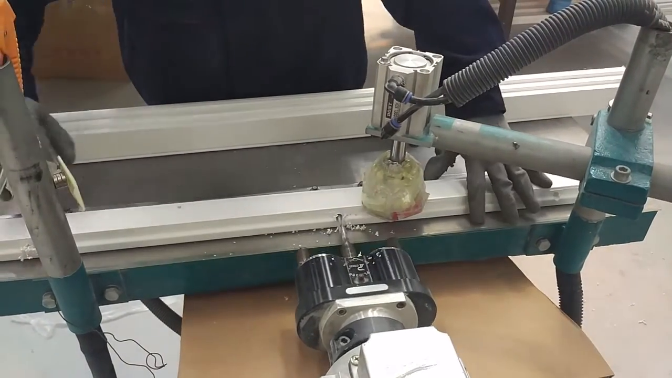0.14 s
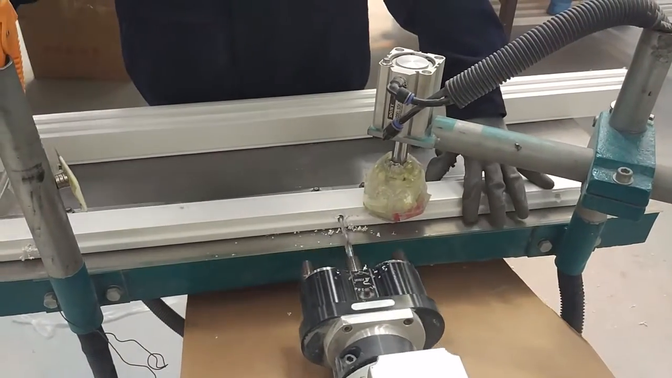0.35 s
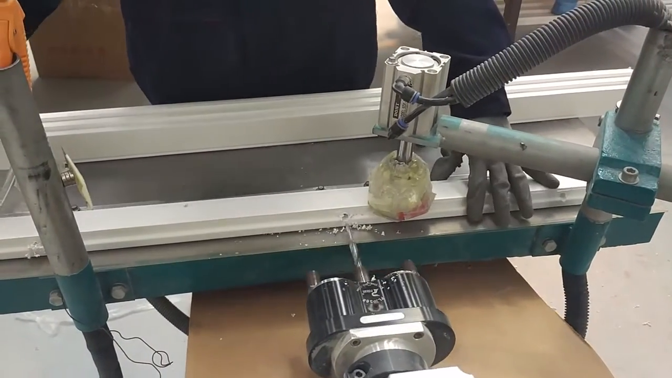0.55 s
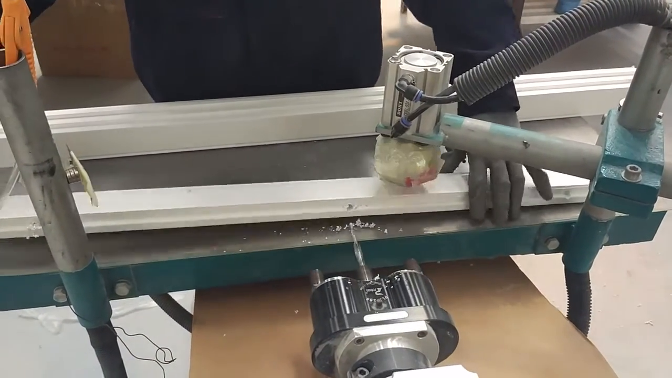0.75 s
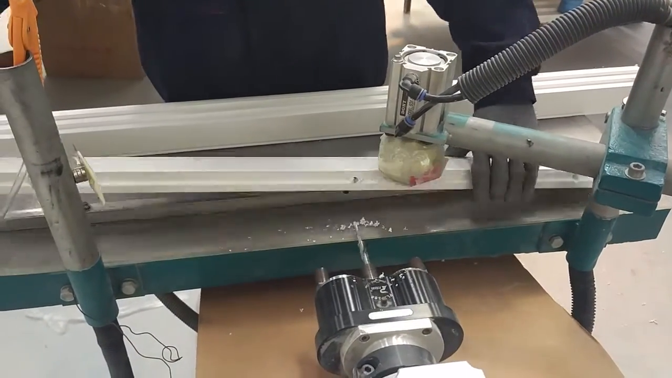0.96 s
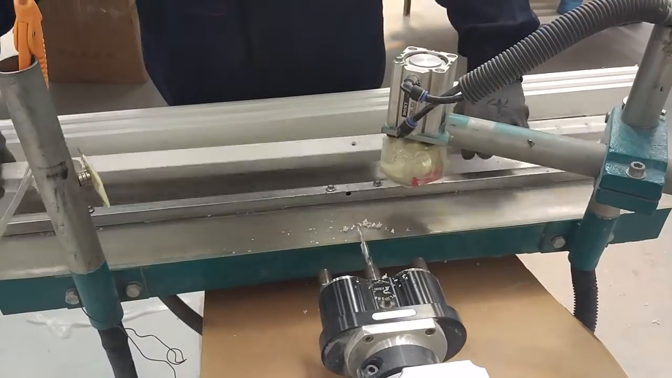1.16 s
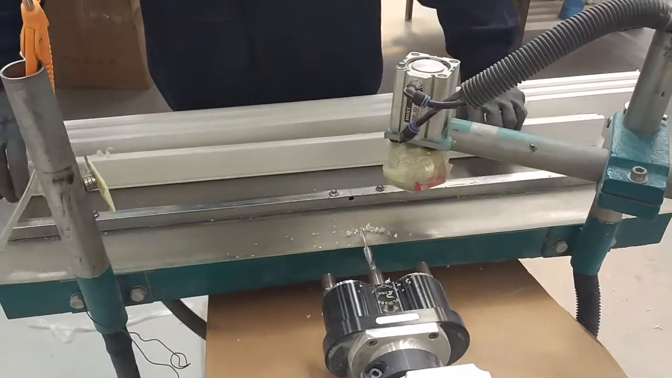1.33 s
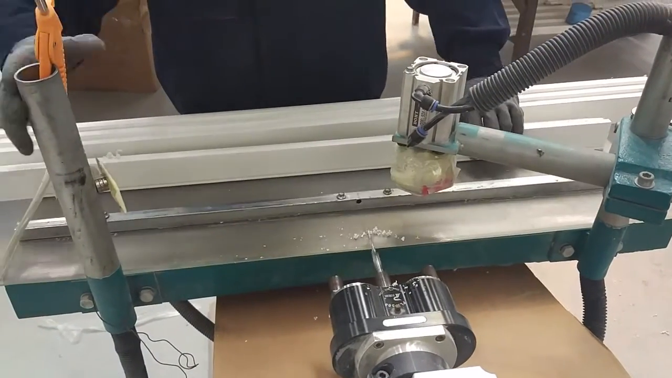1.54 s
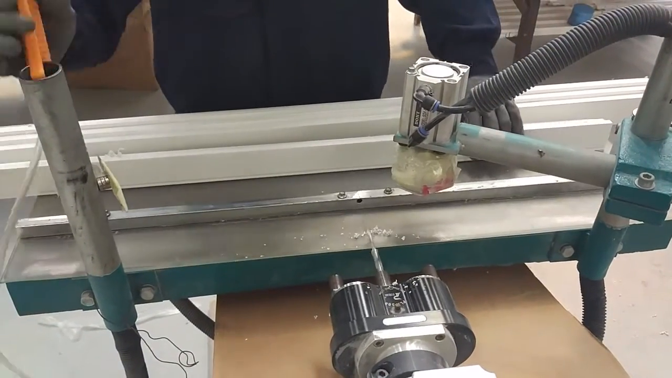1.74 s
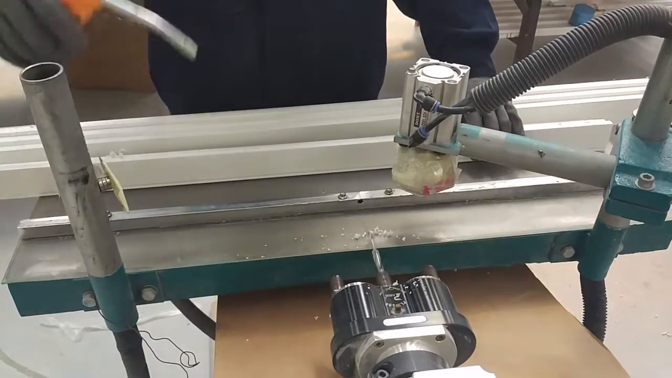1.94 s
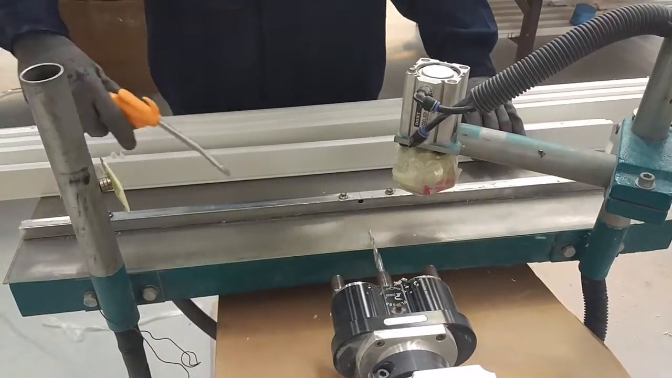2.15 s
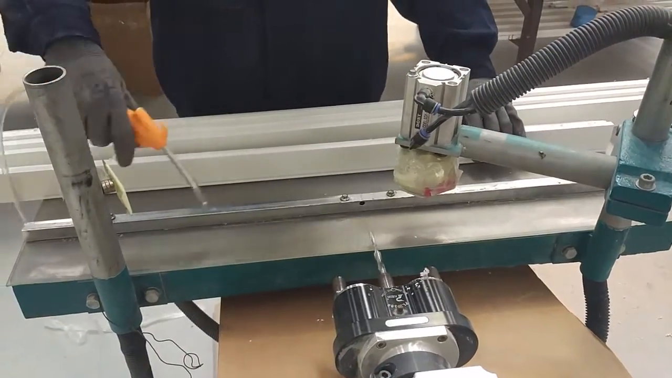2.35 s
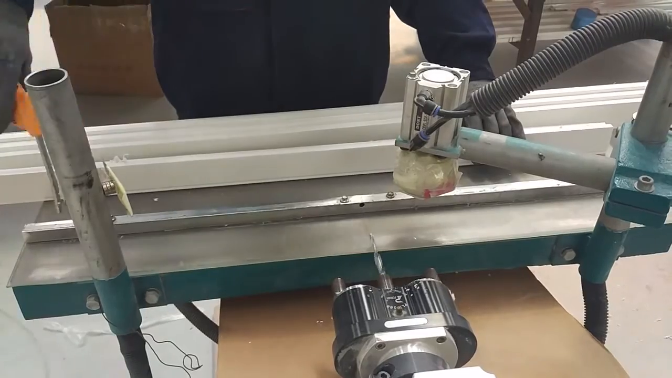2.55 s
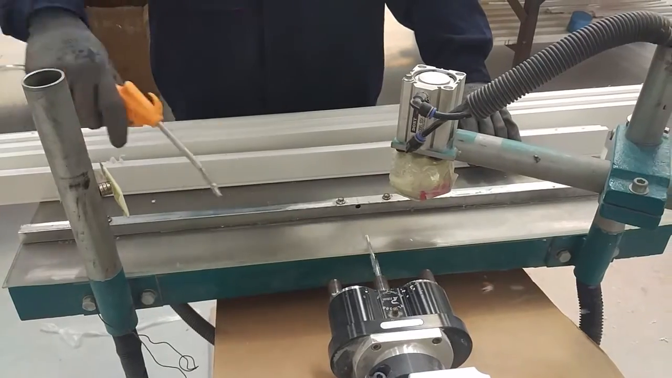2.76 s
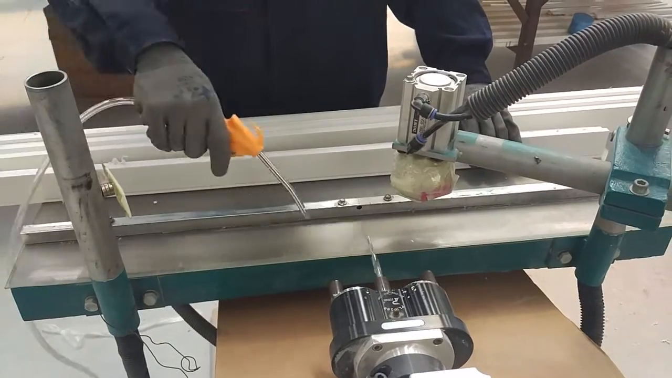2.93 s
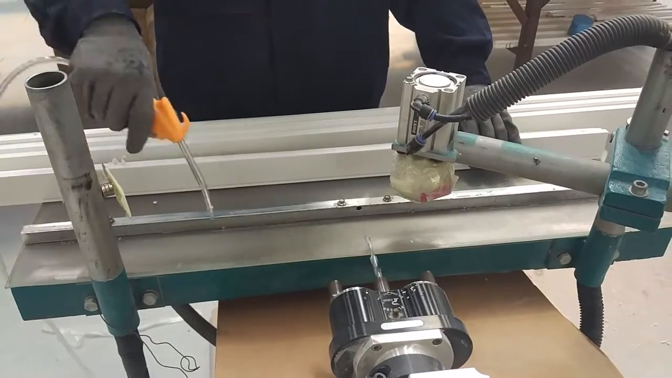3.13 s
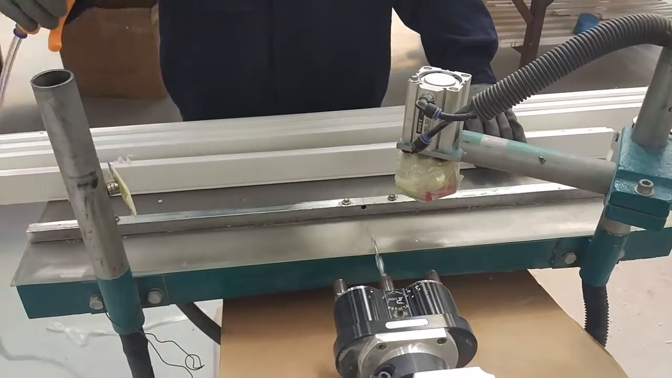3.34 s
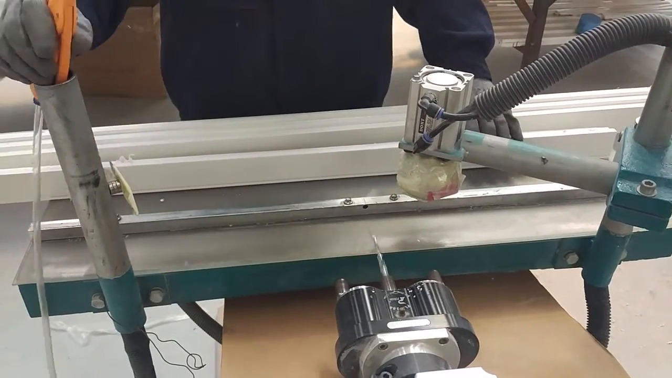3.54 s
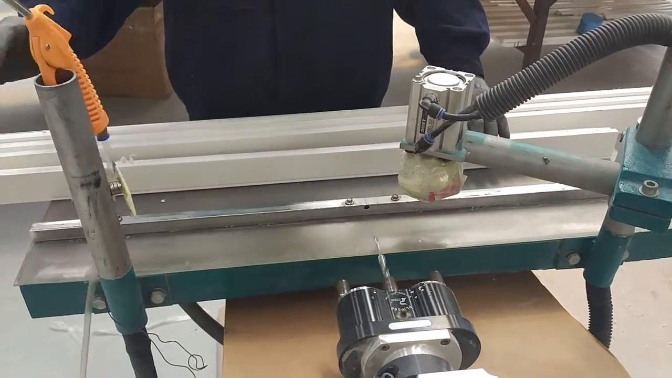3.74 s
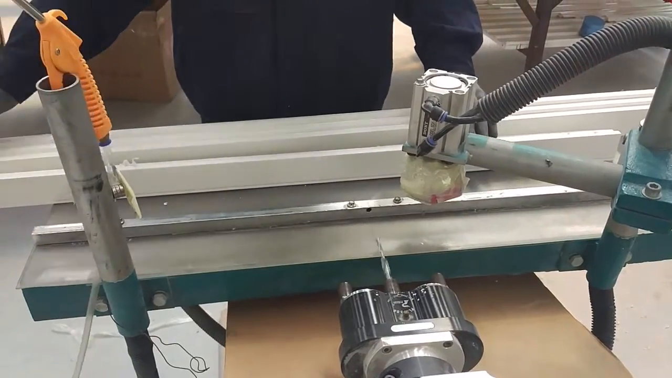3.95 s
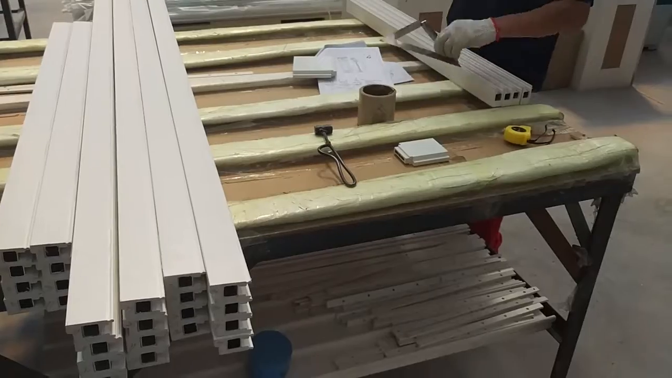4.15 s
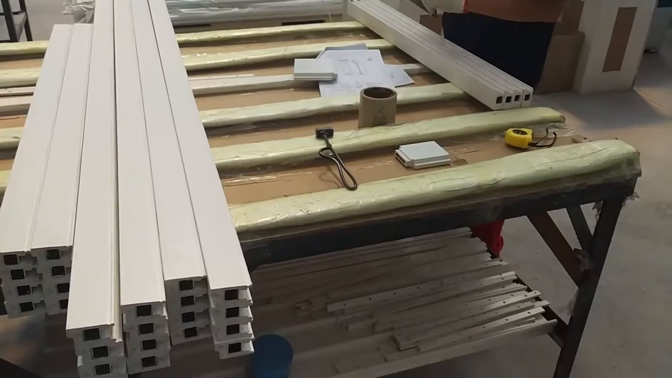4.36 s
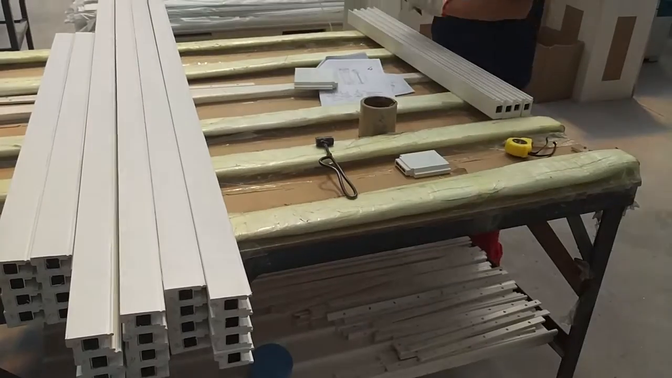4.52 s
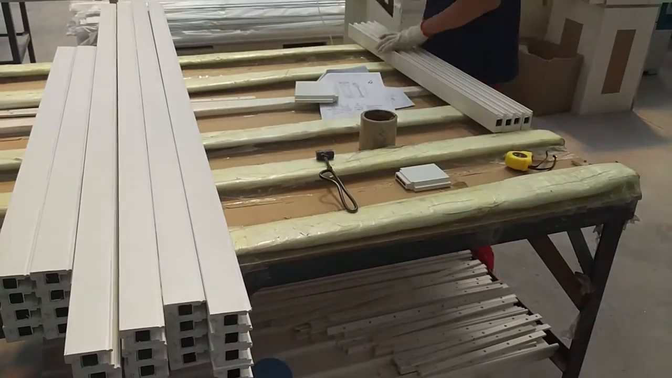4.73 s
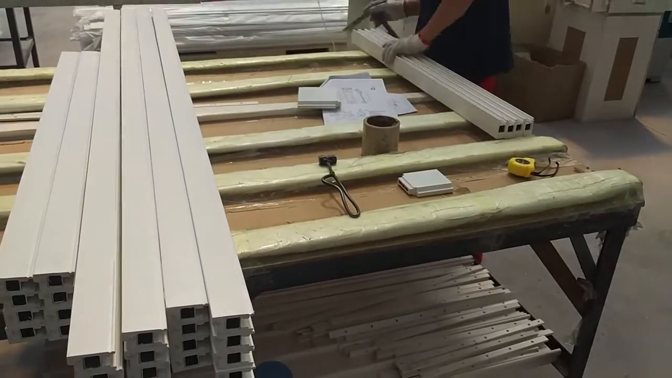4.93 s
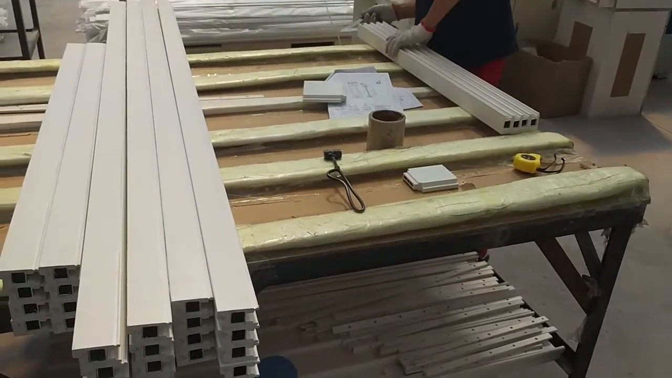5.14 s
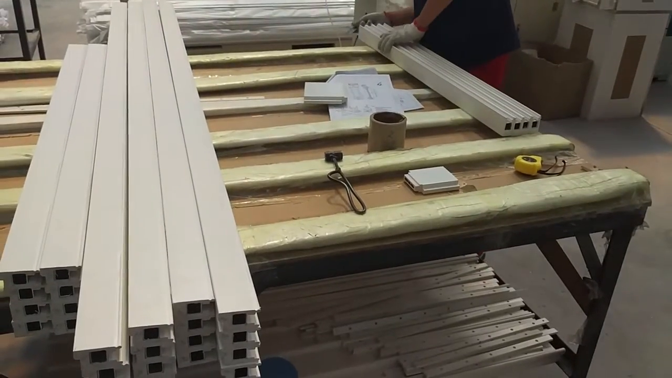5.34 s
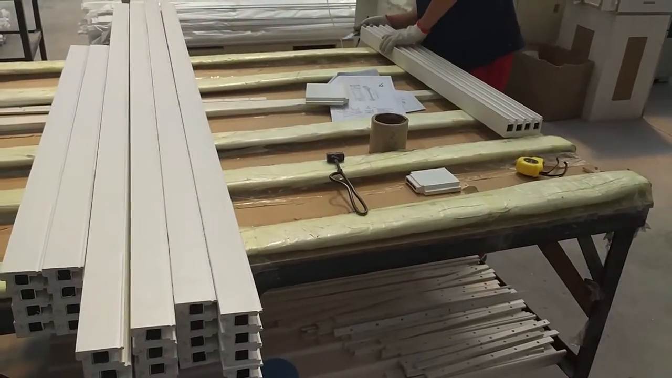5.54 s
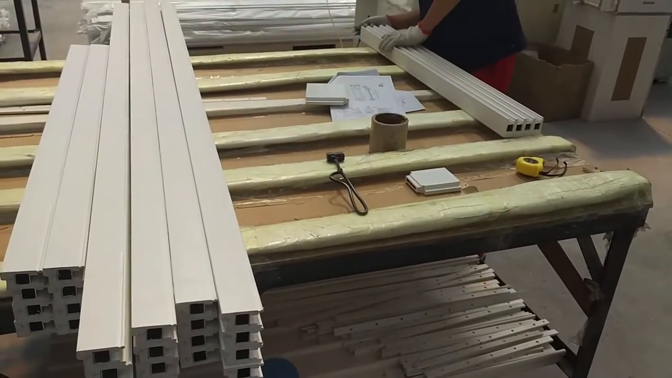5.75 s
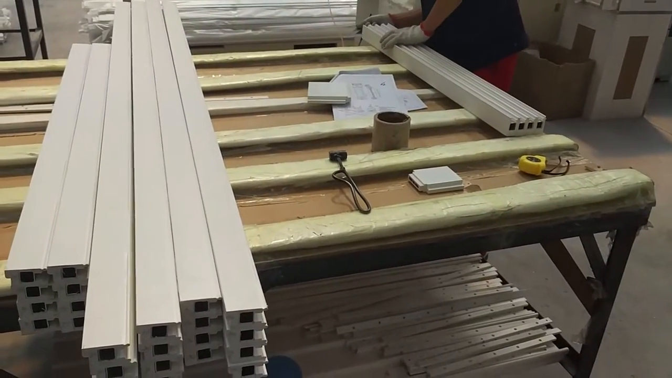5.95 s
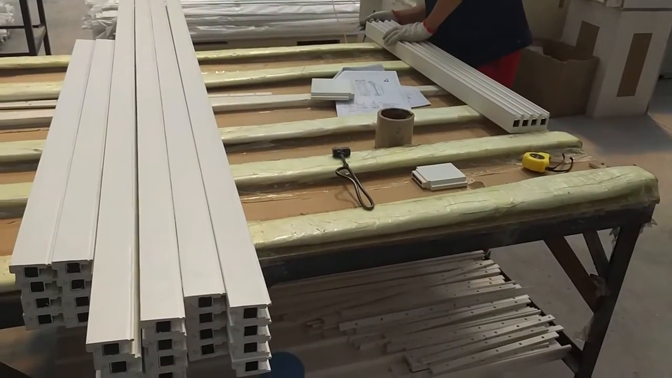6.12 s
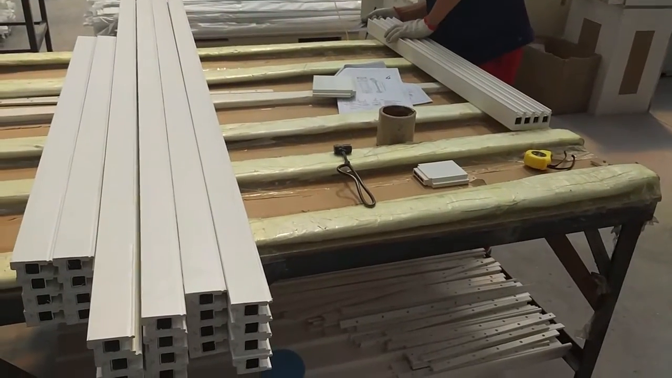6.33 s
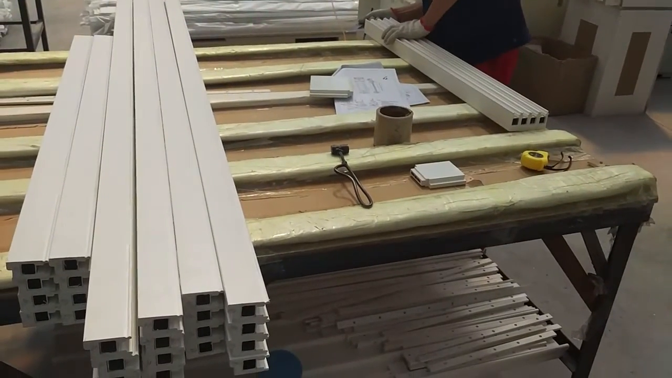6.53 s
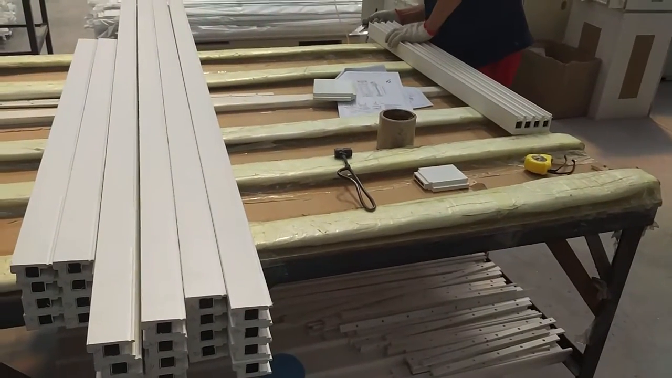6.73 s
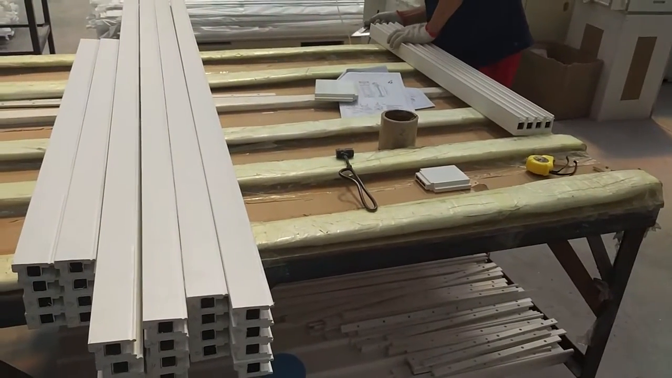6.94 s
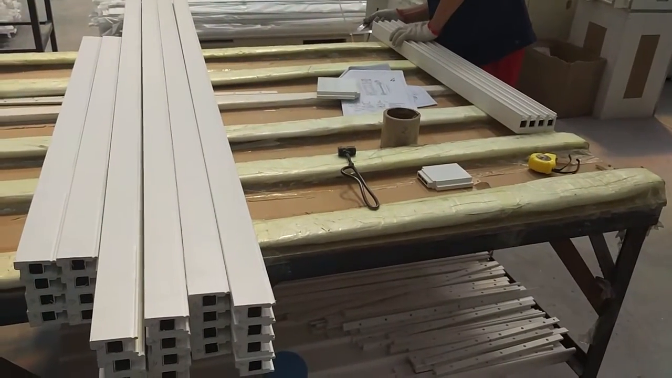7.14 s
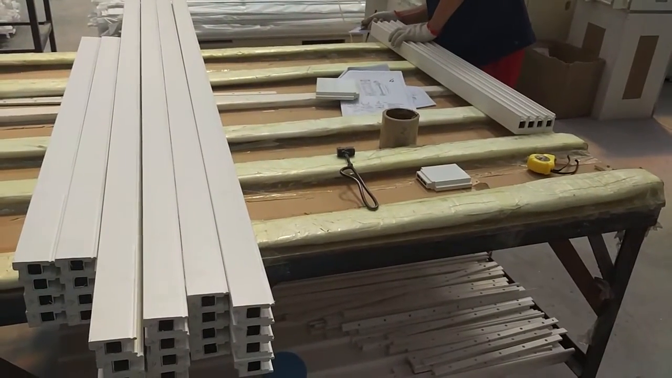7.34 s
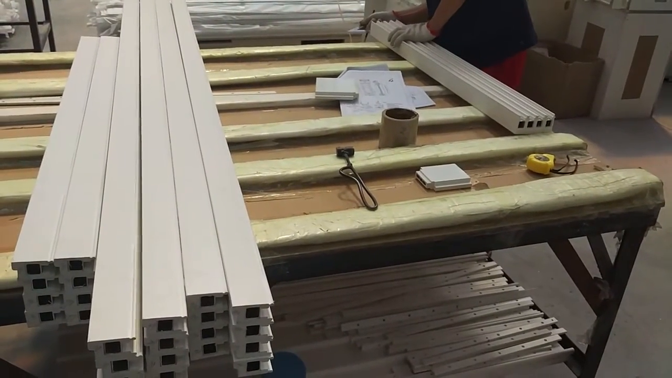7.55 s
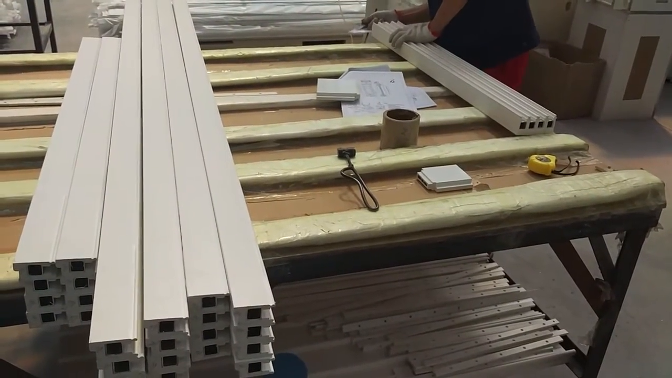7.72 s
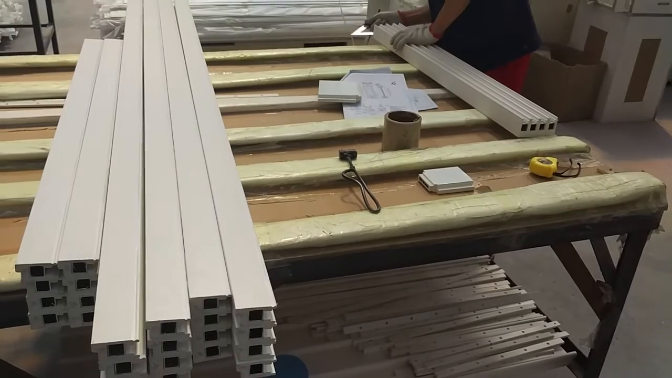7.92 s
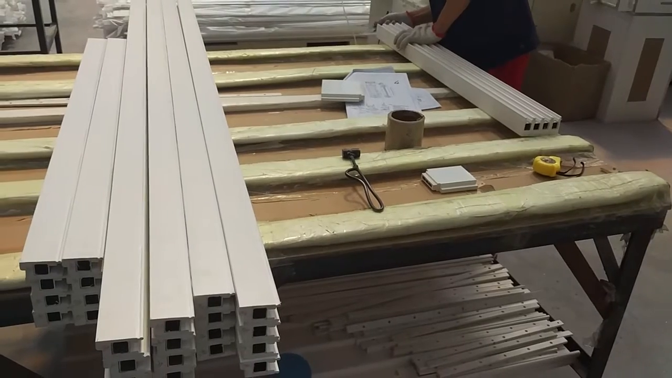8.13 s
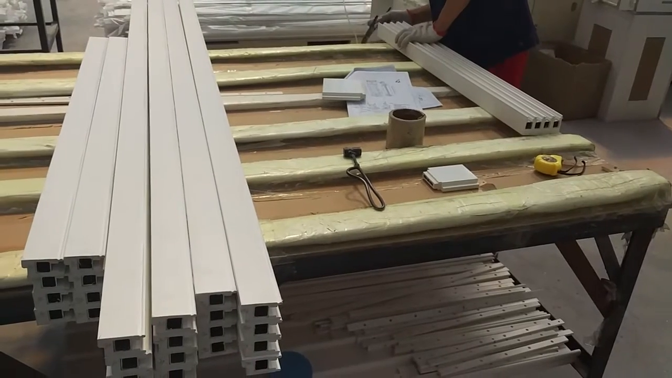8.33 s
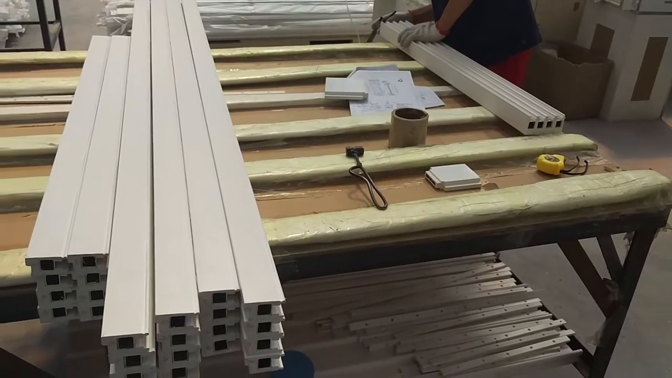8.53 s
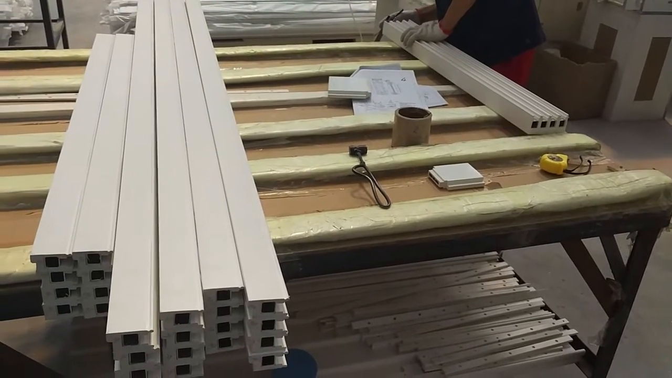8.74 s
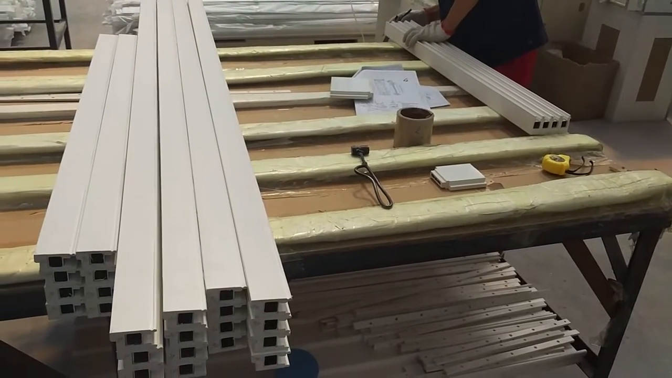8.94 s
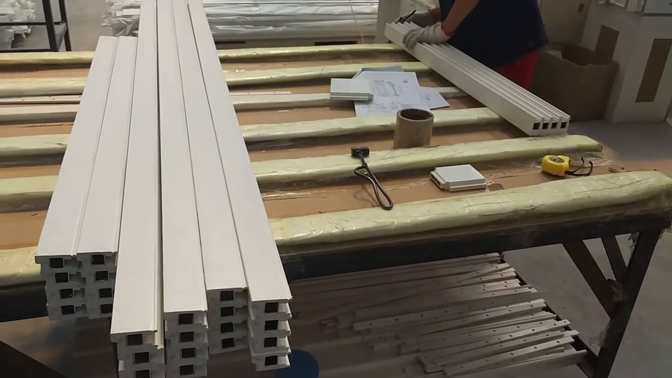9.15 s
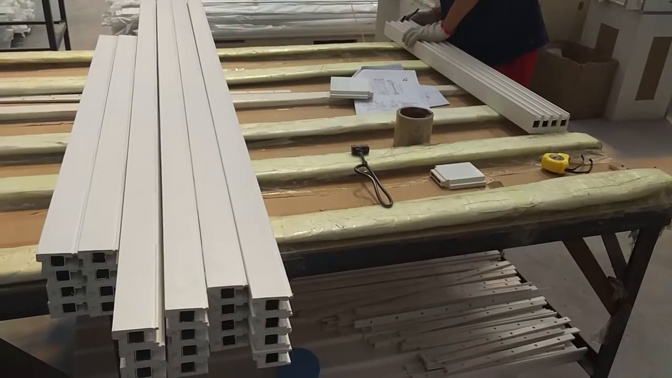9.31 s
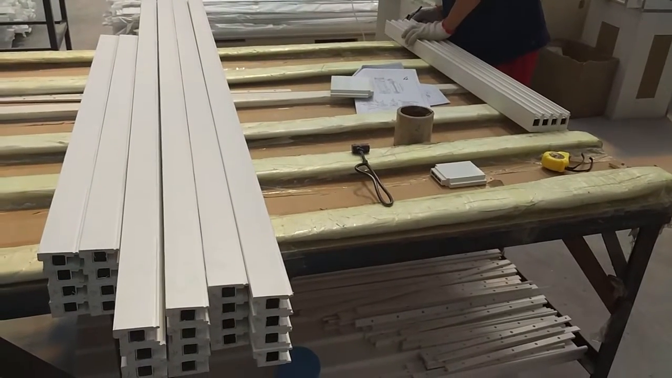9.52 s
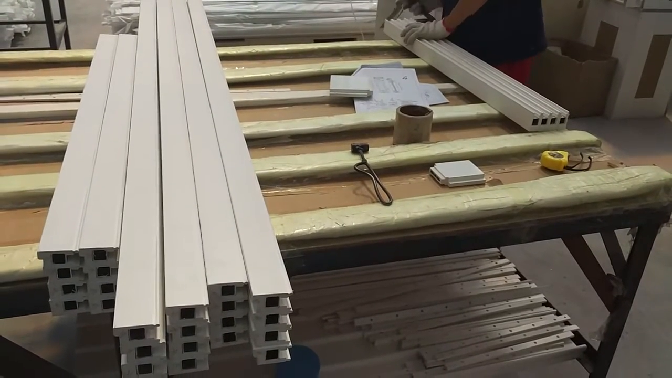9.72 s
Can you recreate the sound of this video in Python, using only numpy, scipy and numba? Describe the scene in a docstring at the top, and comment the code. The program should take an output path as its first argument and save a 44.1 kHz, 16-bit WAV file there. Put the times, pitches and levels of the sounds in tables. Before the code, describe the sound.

Steady factory machine hum with clacking plastic profile, a short pneumatic hiss and knock, a loud spitting air jet, then gusty blow-gun hissing at a bench.

```python
"""Extractor fans hum, beat and rush while a drill spindle whines; a plastic profile slides and clicks on the table.
An air clamp vents and knocks home, the profile is laid down, and a close blow gun sweeps off rattling chips.
From 4 s on, at a bench further off, a blow gun hisses and gusts around hollow profile ends over other motors.
Air is coloured noise, struck parts are decaying modes, machines are wavering sines; gain control ducks it all."""
import sys
import numpy as np
from scipy import signal
from scipy.fft import rfft, irfft
from scipy.io import wavfile
from scipy.ndimage import uniform_filter1d
from numba import njit

SR = 44100
rng = np.random.default_rng(int(sys.argv[2]) if len(sys.argv) > 2 else 0)


def store_pcm(level_fs):
    """Save levels as 16-bit WAV."""
    pcm = np.round(np.clip(level_fs, -1, 1) * 32767).astype(np.int16)
    wavfile.write(sys.argv[1], SR, np.atleast_2d(pcm).T)


N = 435708
T = np.arange(N) / SR
HZ = np.maximum(np.arange(N // 2 + 1) * SR / N, 1)
BENCH_S = 4.028  # drilling station before, bench after

# Blast levels and spectra are relative: blast() adds trims, noise() normalises.
# near blasts: [t/s, length/s, jet/dB, edge/dB, hollow/dB, jet sag/(dB/s)]
NEAR_BLASTS = [(2.121, 1.185, -13, -28, -41.5, 0.55)]
# jet crossing a rim or hole: [t/s, half length/s, edge/dB, hollow/dB]
NEAR_CROSSINGS = [(2.139, 0.019, -22, -40), (2.375, 0.056, -24, -27.5), (2.64, 0.099, -18.5, -31),
                  (2.998, 0.037, -24, -21.5), (3.132, 0.045, -17.5, -21), (3.297, 0.017, -23, -40)]
# whoosh at an opening: [t/s, half length/s, level/dB, f/Hz, width/Hz]
NEAR_GUSTS = [(2.335, 0.018, -20.5, 1410, 1200), (2.39, 0.017, -19.5, 1650, 1500),
              (2.37, .033, -25, 5030, 2200), (2.64, 0.05, -35, 1500, 1000), (2.64, 0.066, -18, 8040, 4000),
              (2.84, .06, -30.5, 4900, 1800), (2.97, .02, -30, 1400, 1200), (3.01, .03, -19, 4950, 1200),
              (3.11, .06, -23.5, 9000, 4000), (3.14, 0.023, -18, 2710, 700),
              (3.15, 0.034, -15.5, 4930, 1380)]
# free jet spectrum: [f/Hz, level/dB per Hz]
NEAR_JET = [(300, -47.5), (1200, -15), (3500, -14), (6000, -2.5), (9000, 0), (11500, 3), (13500, 6.5),
            (16000, 6.5)]
# table edge and hollow resonances: [f/Hz, width/Hz, level/dB]
TABLE_EDGE = [(4750, 900, -2.5), (5750, 1400, -1.5), (7300, 1700, -2)]
TABLE_HOLLOW = [(1370, 790, -9), (2430, 380, 0), (2850, 280, 0.5), (3750, 610, -9)]


def near_gun():
    """Close jet sweeping the table: sputtering air plus a strong band above 17.5 kHz."""
    start_s, length_s = NEAR_BLASTS[0][:2]
    levels = blast_levels(NEAR_BLASTS, NEAR_CROSSINGS, attack_s=.003, release_s=.02)
    air = blast(levels, NEAR_JET, TABLE_EDGE, TABLE_HOLLOW, jet_db=0.7, edge_db=-1.5, hollow_db=1.0,
                left_db=11.5, lag_ms=0.698, flutter_db=1.5, wander_db=2.2, drift=.035, surge_db=0.1)
    air += gusts(NEAR_GUSTS, flutter_db=2.0, left_db=1.5)
    # cut later by record(), but still drives its gain control
    ultrasound = undb(-8.0) * noise(np.clip((HZ - 17500) / 1000, 0, 1))
    air = air * sputter() + ultrasound
    return air * opened(start_s, rise_s=0.008) * (1 - opened(start_s + length_s, rise_s=.015))


def sputter(rate_hz=70, spit_s=.0012, depth=.5):
    """Gain of a spitting jet: brief surges of uneven size at random moments."""
    sizes = np.minimum(rng.exponential(1, N), 2)
    spits = (rng.random(N) < rate_hz / SR) * sizes
    return 1 + depth * signal.lfilter([1], [1, -np.exp(-1 / (spit_s * SR))], spits)


# far blasts: [t/s, length/s, jet/dB, edge/dB, hollow/dB, jet sag/(dB/s)]
FAR_BLASTS = [(3.93, 1.607, -28.5, -32.5, -39, -2.8), (5.53, 0.25, -37, -31, -34, -7),
              (5.97, 0.08, -39, -46, -46, 0), (6.04, 0.22, -32.5, -25, -31, -8),
              (6.27, 0.47, -35.5, -31, -30.5, 6), (6.77, 0.22, -35.5, -47, -40, 18),
              (6.96, 0.41, -31, -28, -35.5, 12), (7.36, 0.22, -31.5, -29, -31.5, -2),
              (7.61, 0.51, -29, -28.5, -33.5, 5), (8.14, 0.16, -42, -33.5, -35.5, 0),
              (8.25, 0.42, -32.5, -26, -31.5, 7), (8.66, 0.36, -29, -24.5, -35.5, 4.5),
              (9.04, .84, -33.5, -32.5, -35.5, 2)]
# jet crossing a rim or hole: [t/s, half length/s, edge/dB, hollow/dB]
FAR_CROSSINGS = [(4.05, 0.019, -28.5, -34), (5.47, .06, -30, -42), (5.77, 0.031, -29, -39),
                 (6.12, 0.03, -37, -43), (7.04, 0.028, -28.5, -31.5), (7.45, 0.055, -35, -31),
                 (7.68, 0.089, -29.5, -31.5), (7.785, 0.015, -26, -43), (9.155, .02, -44, -36),
                 (9.285, 0.019, -36, -31.5), (9.49, 0.036, -31, -32), (9.84, 0.033, -36, -36.5)]
# whoosh at an opening: [t/s, half length/s, level/dB, f/Hz, width/Hz]
FAR_GUSTS = [(4.32, 0.037, -30, 1550, 1200), (4.48, 0.043, -32, 1600, 1200), (4.68, .05, -32, 1670, 1200),
             (4.88, 0.062, -31, 1450, 1400), (5.06, 0.1, -36.5, 1900, 1500), (6.45, 0.2, -41, 1950, 900),
             (6.73, 0.089, -36, 1970, 900), (9.16, 0.021, -32, 1850, 1000), (9.29, 0.022, -36, 1950, 1000),
             (9.48, 0.031, -31, 1900, 1000)]
# free jet spectrum: [f/Hz, level/dB per Hz]
FAR_JET = [(300, -23), (900, -0.5), (1900, -3), (3300, -1.5), (6000, -2.5), (7800, 3), (10300, 0),
           (12500, 4.5), (16000, 4)]
# profile edge and chamber resonances: [f/Hz, width/Hz, level/dB]
PROFILE_EDGE = [(4920, 730, -2), (5575, 410, 5), (6160, 570, 2.5), (6850, 450, -2.5), (7410, 350, -0.5),
                (8200, 980, -5), (9500, 2200, -6)]
PROFILE_HOLLOW = [(1750, 480, -11.5), (2430, 300, 0), (3020, 290, -0.5), (3750, 310, 1.5), (4380, 520, -2)]


def far_gun():
    """Bench jet blowing through profile chambers; the stack throws back a later echo."""
    levels = blast_levels(FAR_BLASTS, FAR_CROSSINGS, attack_s=0.065, release_s=0.076)
    air = blast(levels, FAR_JET, PROFILE_EDGE, PROFILE_HOLLOW, jet_db=6.0, edge_db=2.0, hollow_db=2.0,
                left_db=5.5, lag_ms=1.5, flutter_db=1.08, wander_db=0.12, drift=.01, surge_db=1.1)
    air += gusts(FAR_GUSTS, flutter_db=1.5, left_db=-1)
    return bounce(air, lag_ms=4.3, share=.35, sway=.05) * opened(BENCH_S, rise_s=.003)


# clamp vent: [t/s, length/s, jet/dB, edge/dB, hollow/dB, jet sag/(dB/s)]
CLAMP_VENT = [(0.643, 0.22, -24, -22, -32, 53)]
# vent jet spectrum: [f/Hz, level/dB per Hz]
CLAMP_JET = [(300, -35), (1200, -11), (4000, -6), (6000, -5), (8500, -1), (10300, -5), (12700, 4),
             (15000, -1)]
# clamp edge and hollow resonances: [f/Hz, width/Hz, level/dB]
CLAMP_EDGE = [(5900, 680, 2), (6500, 600, -3), (7800, 2200, 1.5)]
CLAMP_HOLLOW = [(2700, 440, 6.5), (3030, 350, 0), (3840, 600, -14)]


def clamp():
    """The cylinder vents while its piston lifts: a hiss that sags fast."""
    levels = blast_levels(CLAMP_VENT, [], attack_s=0.019, release_s=.012)
    return blast(levels, CLAMP_JET, CLAMP_EDGE, CLAMP_HOLLOW, jet_db=2.0, edge_db=-1.0, hollow_db=4.0,
                 left_db=11.0, lag_ms=0.9, flutter_db=0.0, wander_db=0.3, drift=0.016, surge_db=0.7)


def low_thumps(corner_hz=90, level_db=-38, decay_s=.012):
    """Soft low thump at the start of each nearby blast: a short swell of bass noise."""
    starts_s = [row[0] for row in CLAMP_VENT + NEAR_BLASTS]
    shape = sum(np.exp(-np.minimum(np.abs(T - s) / decay_s, 20)) for s in starts_s)
    return undb(level_db) * shape * noise(1 / (1 + (HZ / corner_hz) ** 2))


def blast_levels(blasts, crossings, attack_s, release_s):
    """Jet, edge and hollow gains: blasts rise, sag with the pressure and die; crossings flare on top."""
    sag_shares = 1, 0.56, 0.34  # jet, edge, hollow
    power = np.zeros((3, N))
    for s, length_s, *db, sag in blasts:
        release = np.exp(-np.clip(T - s - length_s, 0, 1) / release_s)
        shape = opened(s, attack_s) * release
        drop_db = sag * np.clip(T - s, 0, length_s)
        for k, share in enumerate(sag_shares):
            power[k] += (shape * undb(db[k] - share * drop_db)) ** 2
    for s, half_s, *db in crossings:
        flare = np.exp(-np.minimum(((T - s) / half_s) ** 2, 20) / 2)
        power[1:] += np.outer(undb(db), flare) ** 2
    return np.sqrt(power)


def blast(levels, jet, edge, hollow, jet_db, edge_db, hollow_db, left_db, lag_ms,
          flutter_db, wander_db, drift, surge_db):
    """Compressed air hisses as a free jet, sings at an edge and rings the hollows behind it."""
    free, split, inside = levels
    air = free * undb(jet_db + flutter_db * walk(90)) * noise(colour(jet))

    edge_gain = split * undb(edge_db + flutter_db * walk(50) + surge_db * walk(16))
    air += edge_gain * pan(left_db) * glide(noise(resonances(edge)), drift)

    hollow_gain = inside * undb(hollow_db + flutter_db * walk(40) + surge_db * walk(16))
    air += hollow_gain * glide(noise(resonances(hollow), alike_hz=2550), drift)

    air = bounce(air, lag_ms, share=.27, sway=.06)
    # eddies and an unsteady aim shake the whole stream
    return air * undb(flutter_db * walk(60) / 2 + wander_db * walk(14))


def gusts(rows, flutter_db, left_db):
    """Noise bands that swell and fade, as a jet passes an opening or a part slides."""
    t = T[:SR] - .5
    hz_axis = np.arange(SR // 2 + 1)
    out = np.zeros((2, N + 2 * SR))  # 1 s margin each side
    for s, half_s, db, hz, width_hz in rows:
        band = 1 / (1 + (2 * (hz_axis - hz) / width_hz) ** 4) ** .5
        air = unit(irfft(rfft(rng.standard_normal((2, SR))) * band, SR))
        swell = np.exp(-np.minimum((t / half_s) ** 2, 40) / 2)
        start = int((s + .5) * SR)
        out[:, start:start + SR] += undb(db) * air * swell
    return out[:, SR:SR + N] * pan(left_db) * undb(flutter_db * walk(70))


# profile clicks: [t/s, level/dB, pitch ratio set by where it is held]
CLICKS = [(.102, -19, 1), (.126, -17, 1.03), (.140, -10, 1.05), (.158, -22, 1.05), (.178, -9.5, 1.0),
          (1.80, -27, 0.97), (3.765, -23, 1.02)]
# profile modes at ratio 1: [f/Hz, level/dB, t60/s]
PROFILE_MODES = [(2540, -4, .03), (2900, -7, 0.047), (3650, -14, 0.18), (4750, -7, .02), (5140, 2, .035),
                 (5250, -1, .025), (5700, -3, .016), (8200, -10, .02), (9150, -17, .12), (10500, -4, 0.017),
                 (12100, -4, .008)]


def profile_clicks():
    """The plastic profile clicks on the table and rings its modes."""
    return strikes(CLICKS, PROFILE_MODES, contact_s=0.0021, left_db=6.5, crack=0.34)


# clamp and work knocking on the table: [t/s, level/dB]
KNOCKS = [(.35, -16), (.847, -3)]
# frame modes: [f/Hz, level/dB, t60/s]
FRAME_MODES = [(950, -5, .03), (1420, -7, .02), (2050, 10, 0.033), (2140, 10, .03), (2700, 1, .025),
               (3190, 2, .025), (4200, 3, .02), (4650, -1, .018), (5950, 2, .018)]


def knocks():
    """Clamp and work knock on the table and ring the frame."""
    return strikes(KNOCKS, FRAME_MODES, contact_s=0.00066, left_db=2.0, crack=0.18)


# chips and grit hitting steel: [t/s, level/dB]
CHIPS = [(2.186, -10), (2.232, -22), (2.454, -9.5), (2.459, -12), (2.79, -14.5), (2.891, -20),
         (3.249, -9.5)]
# their short rings: [f/Hz, level/dB, t60/s]
CHIP_MODES = [(605, -7, 0.0055), (1200, -6, .005), (1920, 0, .004), (2680, -1, 0.0037), (3540, 4, 0.005)]


def chips():
    """Chips flicked by the jet tick against the steel."""
    return strikes(CHIPS, CHIP_MODES, contact_s=0.00074, left_db=13.0, crack=.05)


# profile laid on the pile: [t/s, level/dB]
SET_DOWN = [(1.337, -18.5)]
# bending modes: [f/Hz, level/dB, t60/s]
BENDING_MODES = [(760, -7, .03), (1050, 0, .035), (1190, -2, .03), (1500, -2, 0.028), (1800, -5, .025),
                 (2800, -8, .02), (4500, -13, 0.017)]


def set_down():
    """The profile lands on the pile and rings in bending."""
    return strikes(SET_DOWN, BENDING_MODES, contact_s=0.003, left_db=-3, crack=.08)


# profile pushed over the table: [t/s, half length/s, level/dB, f/Hz, width/Hz]
SLIDES = [(.05, 0.084, -36, 5470, 5000), (.27, .07, -40.5, 2880, 1000)]


def slides():
    """The profile's sliding friction is a brief band of noise."""
    return gusts(SLIDES, flutter_db=3.5, left_db=4.0)


def strikes(rows, modes, contact_s, left_db, crack):
    """Each blow is a brief rough contact that cracks and rings the modes of the part."""
    t = T[:SR // 4]
    out = np.zeros((2, N + SR))
    for s, db, *pitch in rows:
        ratio = pitch[0] if pitch else 1
        ring = np.zeros(len(t))
        for hz, mode_db, t60_s in modes:
            decay = np.exp(-np.log(1000) * t / t60_s)
            ring += undb(mode_db) * decay * np.sin(2 * np.pi * hz * ratio * t)
        ring[:2] += crack * np.linalg.norm(ring) * np.array([1, -1]) / np.sqrt(2)
        # the pressure builds, then lets go
        contact = rng.standard_normal((2, len(t))) * t * np.exp(-t / contact_s)
        hit = signal.fftconvolve(contact, ring[None], axes=1)[:, :len(t)]
        start = int(s * SR)
        out[:, start:start + len(t)] += undb(db) * hit / np.abs(hit).max()
    return out[:, :N] * pan(left_db)


# idling spindle drive: [f/Hz, level/dB, left minus right/dB]
SPINDLE = [(2360, -48.5, 1), (3644, -56, 2), (5260, -57, 2), (6120, -67, 0), (6320, -56, 0)]


def spindle(whine_hz=12618, whine_db=-51, fade_db_per_s=-1.4):
    """The idling drill's drive lines, topped by a high whine that slowly fades."""
    whine = tones([(whine_hz, 0, -4)], waver_hz=14, waver_db=3.5)
    drive = tones(SPINDLE, waver_hz=20, waver_db=4.5)
    drill = drive + undb(whine_db + fade_db_per_s * T) * whine
    return drill * (1 - opened(BENCH_S))


# other motors near the bench: [f/Hz, level/dB, left minus right/dB]
MOTORS = [(327, -48.5, 12), (746, -52.5, -1), (1090, -57.5, -10)]


def bench_motors():
    """Steady motor lines at the bench."""
    return tones(MOTORS, waver_hz=4.44, waver_db=3) * opened(BENCH_S)


def tones(rows, waver_hz, waver_db):
    """Thin machine lines that waver in pitch and level."""
    out = 0
    for hz, db, left_db in rows:
        phase = 2 * np.pi * np.cumsum(hz + waver_hz * walk(40)) / SR
        level = undb(db + waver_db * walk(7))
        out = out + pan(left_db) * level * np.sqrt(2) * np.sin(phase)
    return out


# fan pairs: [lull t/s, beat period/s, first fan/dB at the lull, second fan/dB, first fan growth/(dB/s)]
FANS_DRILL = (1.16, 1.07, -37.5, -46, 0.5)
FANS_BENCH = (4.48, 1.36, -35.6, -36.1, 1.25)
# slow change of the blade tone: [t/s, level/dB]
HUM_LEVEL = [(0, 0), (4.0, 0), (5.3, 0.5), (5.8, -4), (6.3, -2.5), (6.9, 0), (7.9, 1), (9.2, 1), (9.8, -1)]
# octave of the blade tone, before beating: [t/s, level/dB]
OCTAVE = [(0, -53), (4.0, -48), (5.6, -41), (6.9, -39.5), (8.0, -45), (8.8, -45.5), (9.88, -51)]


def fan_hum(blade_hz=295.9):
    """Blade tones of two fans of nearly equal speed beat, with an octave beating on its own."""
    blade = np.where(T < BENCH_S, fans(*FANS_DRILL), fans(*FANS_BENCH))
    blade = blade * undb(curve(HUM_LEVEL) + .8 * walk(11.0))
    octave_beat = beating(lull_s=5.92, period_s=0.595, first=0.58, second=undb(-10.5))
    octave = undb(curve(OCTAVE)) * octave_beat
    turn = np.exp(2j * np.pi * np.cumsum(blade_hz * (1 + 0.00062 * walk(4.9))) / SR)
    return np.sqrt(2) * np.imag(blade * turn + octave * turn ** 2)


def fans(lull_s, period_s, first_db, second_db, growth_db_per_s):
    """Blade tones of a pair of fans swell and cancel in turn."""
    first = undb(first_db + growth_db_per_s * (T - lull_s))
    return beating(lull_s, period_s, first, undb(second_db))


def beating(lull_s, period_s, first, second):
    """Complex amplitude of two nearly equal tones that drift in and out of step."""
    slip = np.exp(1j * np.pi * (T - lull_s) / period_s)
    return first * slip - second / slip


# duct rush spectra: [f/Hz, level/dB per Hz]
DUCT_DRILL = [(90, -23), (150, -18.5), (225, 2), (330, -1), (560, -6.5), (800, -4), (1250, -8.5),
              (2450, -5.5), (3900, -17), (5200, -16), (8500, -19.5), (9800, -28), (12000, -30.5),
              (15500, -28.5)]
DUCT_BENCH = [(90, -23), (150, -20), (210, -0.5), (265, -2.5), (335, -2), (375, -8), (470, -3), (550, -11),
              (770, -6), (950, -10.5), (1090, -8), (1300, -14), (2400, -11), (4000, -19.5), (6000, -18),
              (16000, -29.5)]


def duct_rush():
    """Turbulent air rushes in the extractor ducts; at the drill it leans left around 6 kHz."""
    lean_db = 4.6 * np.exp(-(np.log(HZ / 6000) / .5) ** 2)
    lean = undb(np.array([[1], [-1]]) * lean_db)
    drill = undb(-29.5 + 0.07 * walk(6.4)) * noise(colour(DUCT_DRILL) * lean, alike_hz=1050)
    bench = undb(-31.0 + .5 * walk(6.3)) * noise(colour(DUCT_BENCH), alike_hz=950)
    at_bench = opened(BENCH_S)
    return drill * (1 - at_bench) + bench * at_bench


def hall(x, wet_db, t60_s=0.45):
    """Add the diffuse tail of the workshop: decaying noise after 8 ms."""
    t = T[:SR]
    tail = rng.standard_normal((2, SR)) * np.exp(-np.log(1000) * t / t60_s) * (t > .008)
    tail /= np.sqrt(np.sum(tail ** 2, axis=1, keepdims=True))
    return x + undb(wet_db) * signal.fftconvolve(x, tail, axes=1)[:, :N]


def bounce(x, lag_ms, share, sway):
    """Weak echo off a nearby surface; its path to each microphone changes as the hand moves."""
    n = np.arange(N)
    lags = [lag_ms * SR / 1000 * (1 + sway * walk(3)) for _ in x]
    echo = np.array([np.interp(n - lag, n, c) for lag, c in zip(lags, x)])
    return (x + share * echo) / np.sqrt(1 + share ** 2)


def glide(x, drift):
    """Slide the resonances in a noise up and down by a share of their pitch."""
    place = np.cumsum(1 + drift * walk(11)) % (N - 1)
    return np.array([np.interp(place, np.arange(N), c) for c in x])


def noise(gain, alike_hz=1000):
    """Coloured noise at two microphones: alike in the bass, slightly opposed above, unrelated in the treble."""
    r = (HZ / alike_hz) ** 3
    likeness = .98 * (1 - .7 * r) / (1 + r ** 2)
    mid, side = rfft(rng.standard_normal((2, N)))
    mid = mid * np.sqrt(1 + likeness)
    side = side * np.sqrt(1 - likeness)
    return unit(irfft(np.array([mid + side, mid - side]) * gain, N))


def colour(points):
    """Gain per frequency through (Hz, dB) points."""
    hz, db = np.transpose(points)
    return undb(np.interp(np.log(HZ), np.log(hz), db))


def resonances(modes):
    """Gain per frequency of steep-sided resonances."""
    power = 0
    for hz, width_hz, db in modes:
        power = power + (undb(db) / (1 + ((HZ - hz) / (0.63 * width_hz)) ** 2)) ** 2
    return np.sqrt(power)


def walk(rate_hz):
    """Random levels held 1 / rate_hz and slewed twice; spread near 1."""
    k = int(SR / rate_hz)
    held = rng.standard_normal(4096)[np.arange(N) // k % 4096]
    return 1.3 * uniform_filter1d(uniform_filter1d(held, k), k)


def curve(rows):
    """(s, dB) points joined by straight lines in time."""
    s, db = np.transpose(rows)
    return np.interp(T, s, db)


def opened(s, rise_s=0.0019):
    """Ramp from 0 to 1 that starts at time s."""
    return np.clip((T - s) / rise_s, 0, 1)


def pan(left_db):
    """Left and right gains for a left minus right level."""
    return undb(np.array([[left_db], [-left_db]]) / 2)


def undb(db):
    """Decibels to gain."""
    return 10 ** (np.asarray(db) / 20)


def unit(x):
    """Scale to rms 1."""
    return x / np.sqrt(np.mean(x ** 2))


def scene():
    """Near air and knocks sound in the hall; far gun, low thumps and steady machines are added dry."""
    hits = profile_clicks() + knocks() + chips() + set_down() + slides()
    near = hall(near_gun() + clamp() + hits, wet_db=-11.5)
    machines = spindle() + bench_motors() + fan_hum() + duct_rush()
    return near + far_gun() + low_thumps() + machines


@njit
def follow(power, attack, release):
    """Level follower that rises fast and falls slowly."""
    out, e = np.empty(len(power)), 0.
    for i in range(len(power)):
        e += (power[i] - e) * (attack if power[i] > e else release)
        out[i] = e
    return out


def record(dry, limit_db=-15.0, attack_s=0.012, release_s=0.028, bass_hz=165, leak_db=-22, top_hz=15750):
    """Microphones lose bass; gain control ducks everything under loud air; the top is cut steeply."""
    bass_cut = signal.butter(4, bass_hz, "high", fs=SR, output="sos")
    x = signal.sosfilt(bass_cut, dry) + undb(leak_db) * dry
    power = uniform_filter1d(np.mean(x ** 2, axis=0), size=900)
    power = follow(power, 1 / (attack_s * SR), 1 / (release_s * SR))
    gain = 1 / np.sqrt(np.maximum(power / undb(limit_db) ** 2, 1))
    top_cut = signal.ellip(12, .2, 90, top_hz, fs=SR, output="sos")
    return signal.sosfilt(top_cut, x * gain)


dry = scene()
out = record(dry)
store_pcm(out)
```